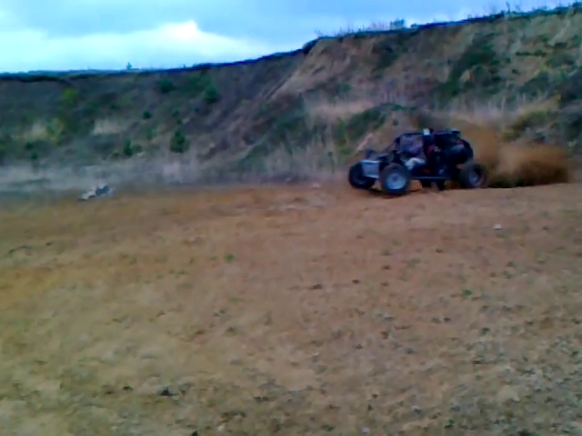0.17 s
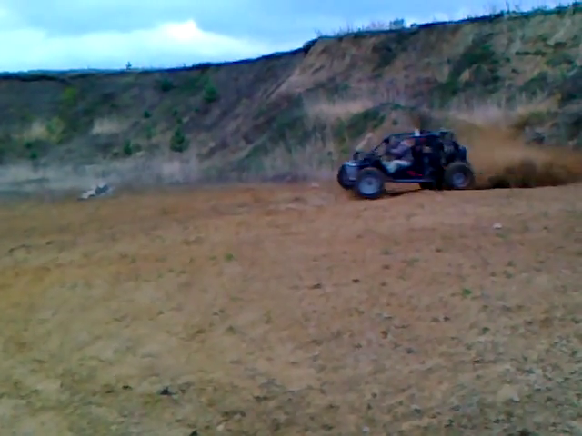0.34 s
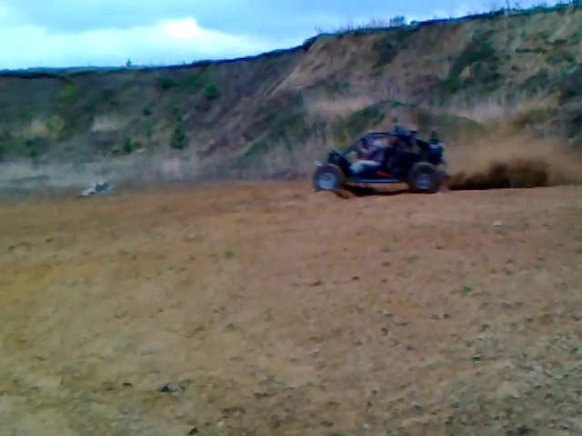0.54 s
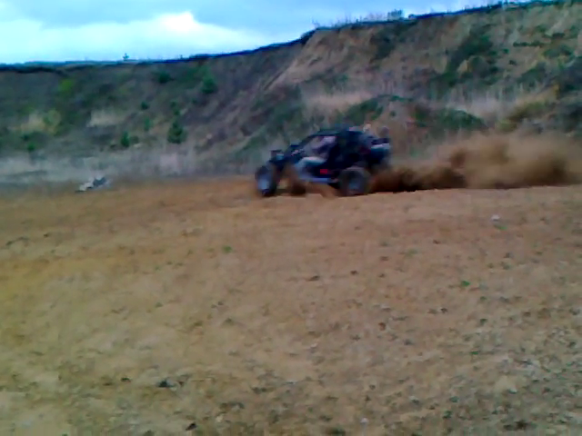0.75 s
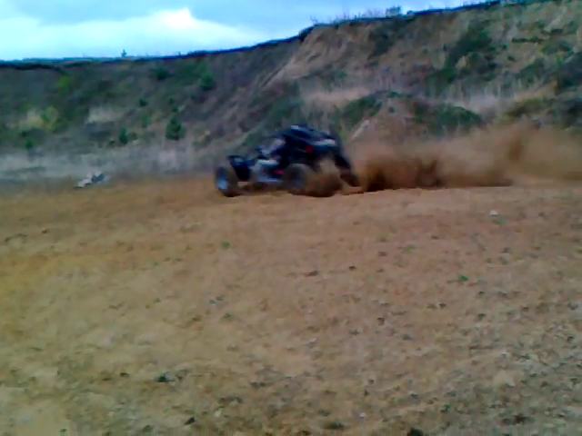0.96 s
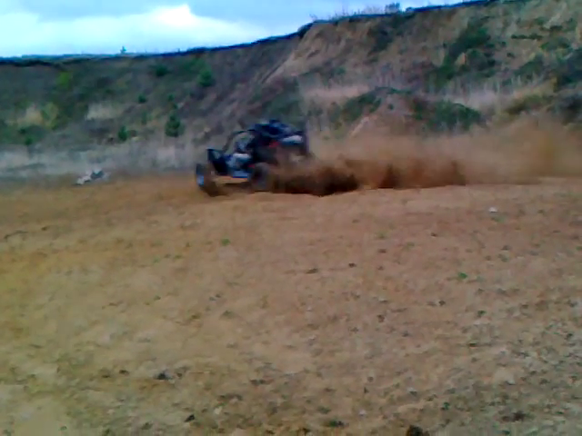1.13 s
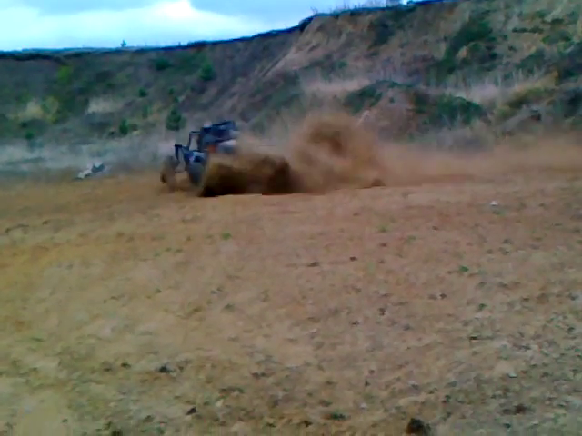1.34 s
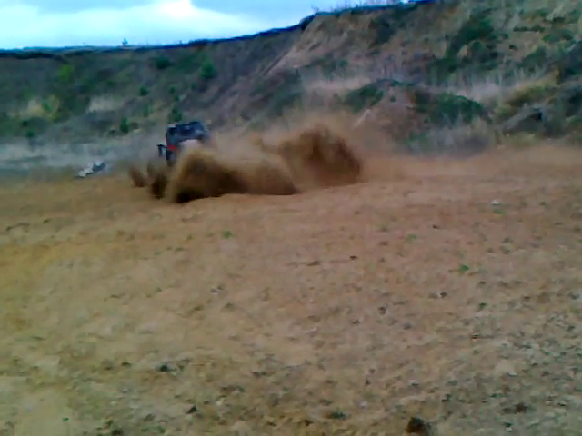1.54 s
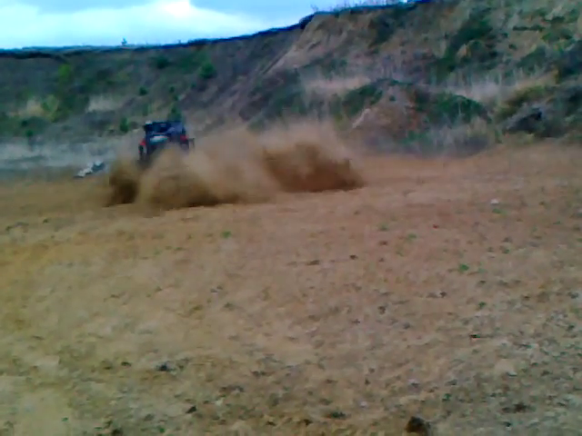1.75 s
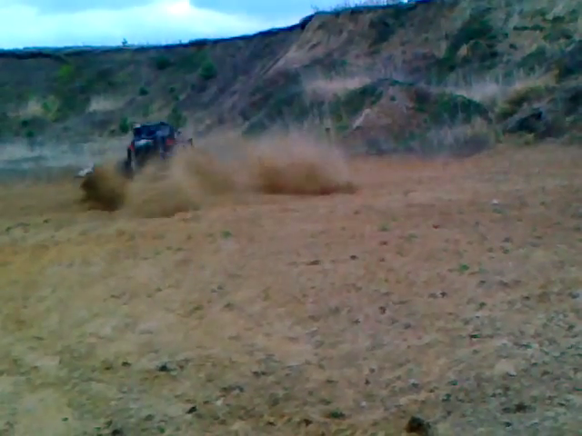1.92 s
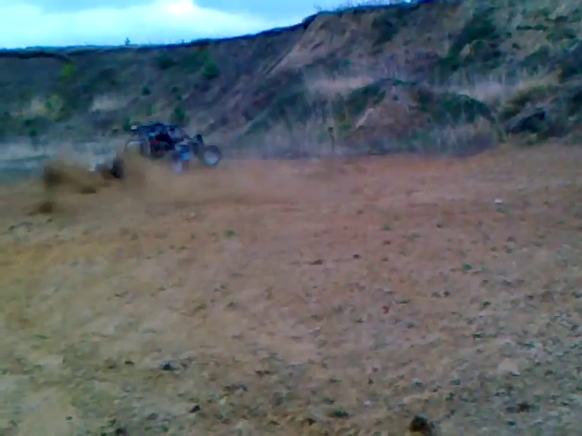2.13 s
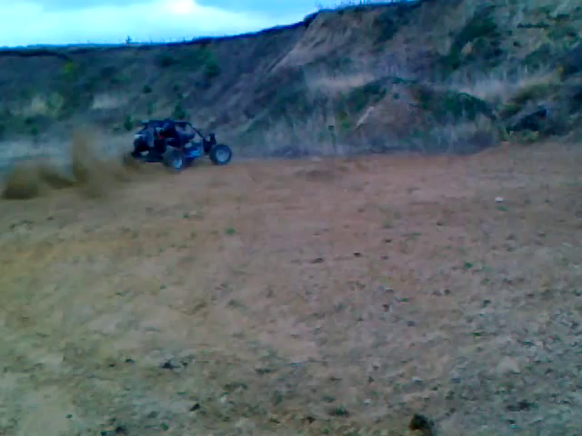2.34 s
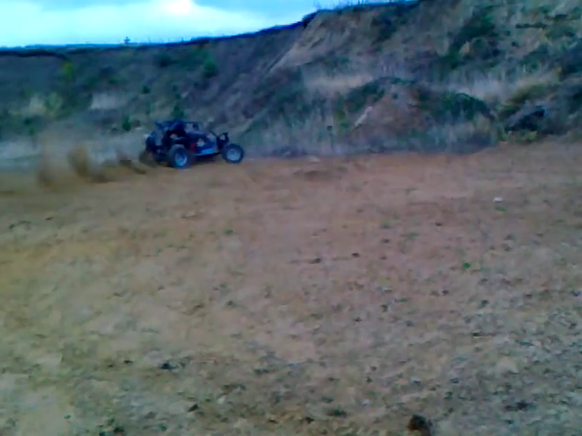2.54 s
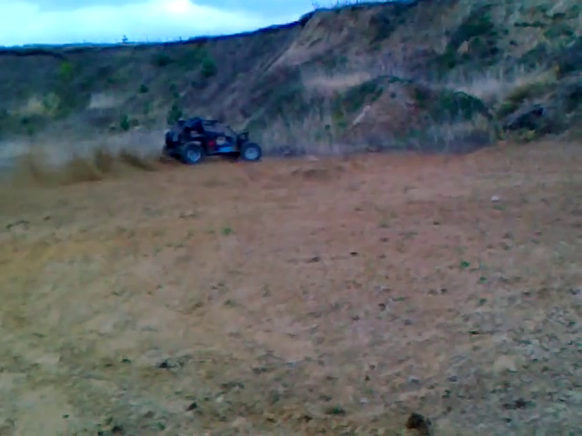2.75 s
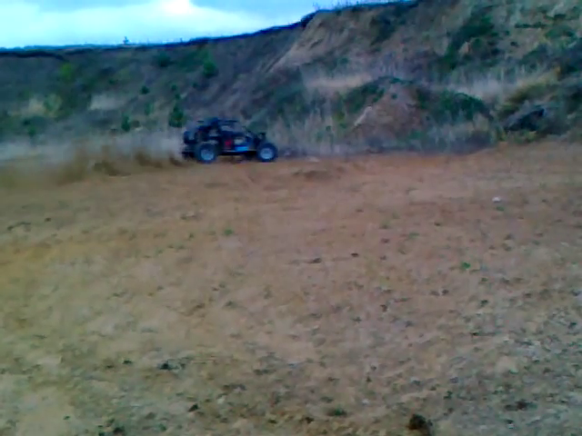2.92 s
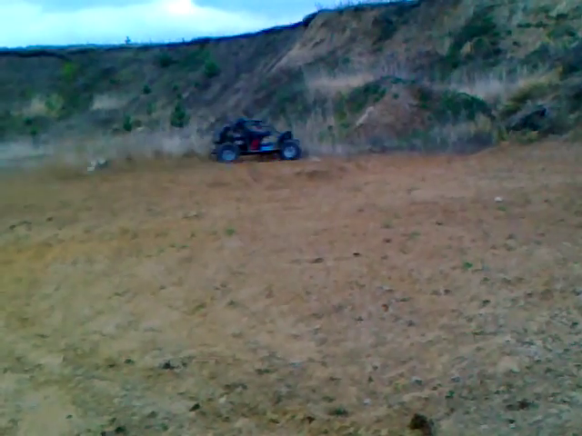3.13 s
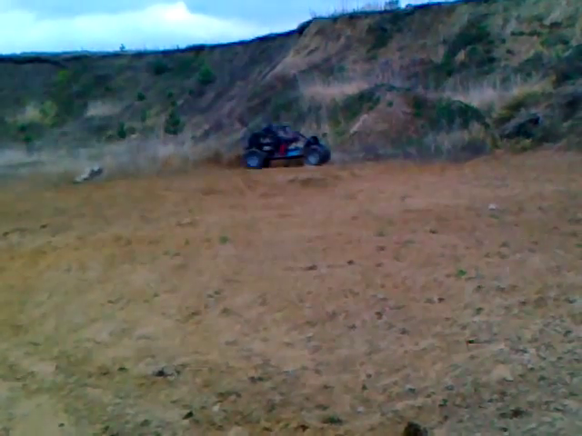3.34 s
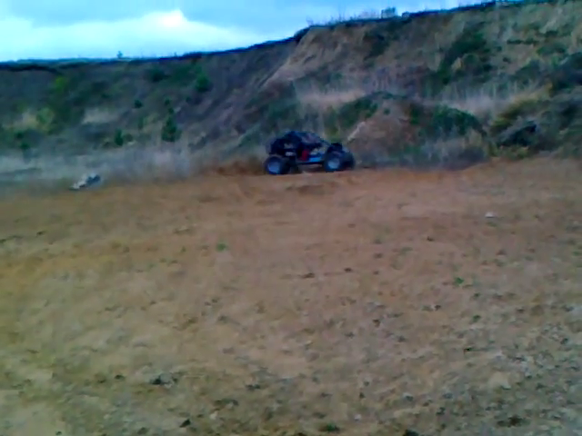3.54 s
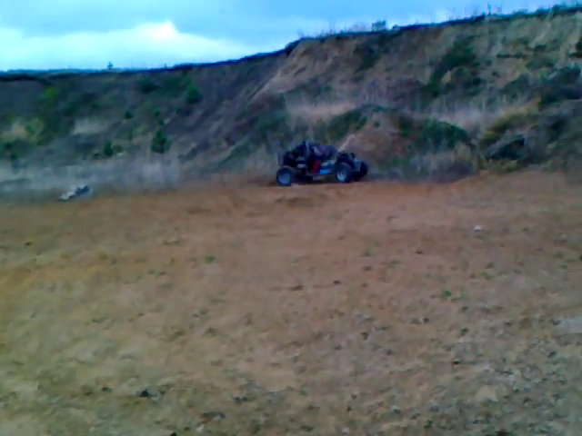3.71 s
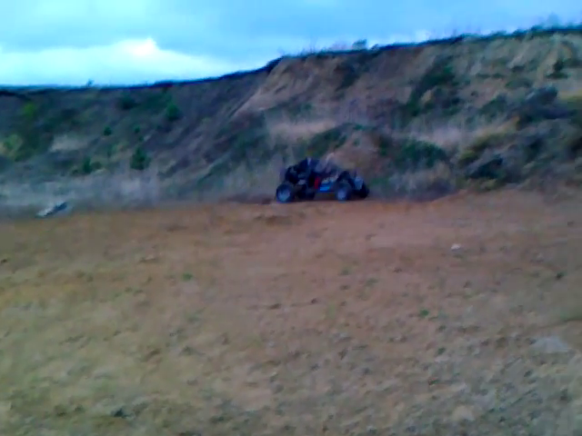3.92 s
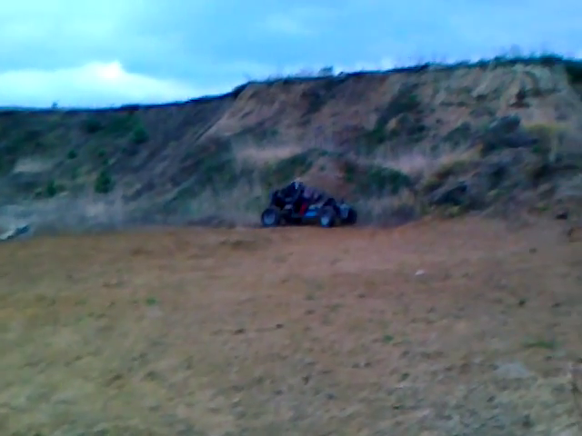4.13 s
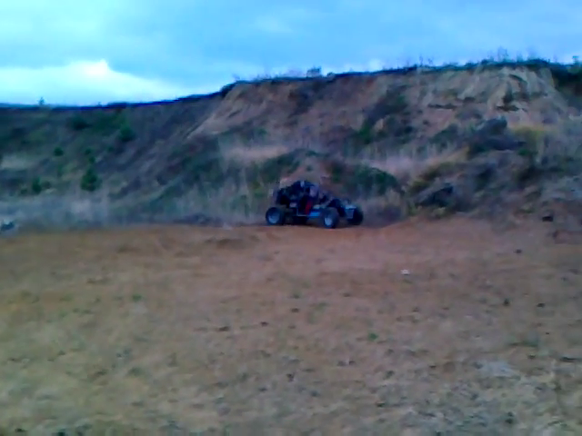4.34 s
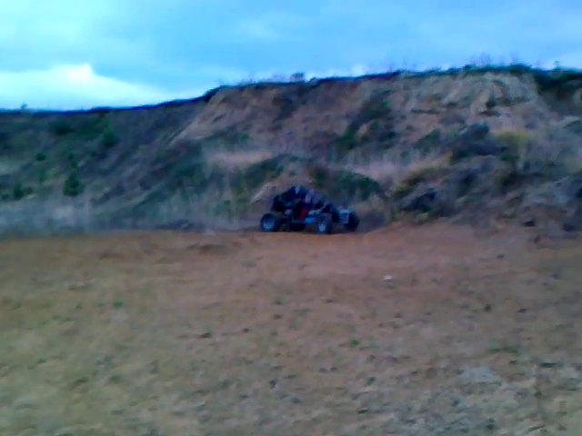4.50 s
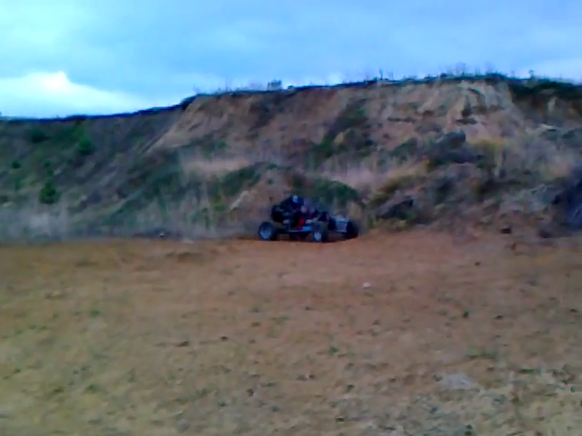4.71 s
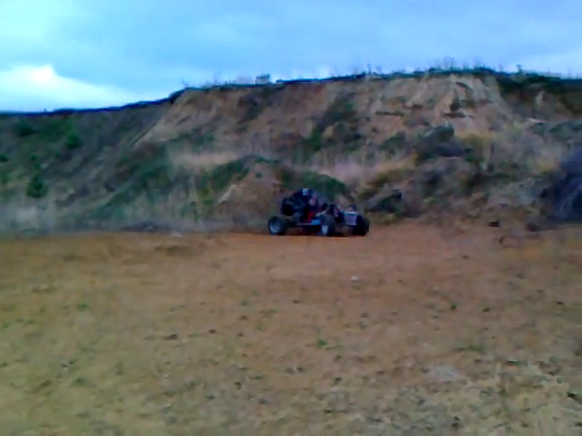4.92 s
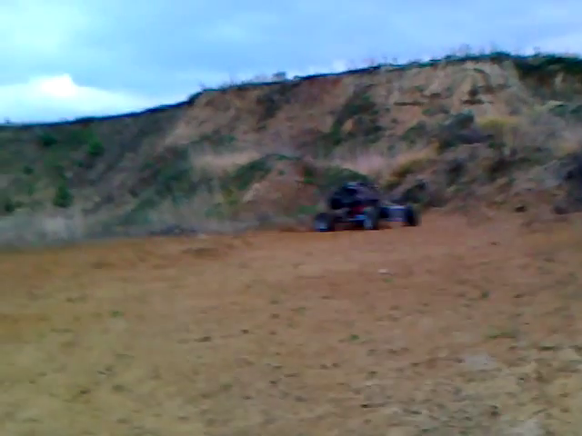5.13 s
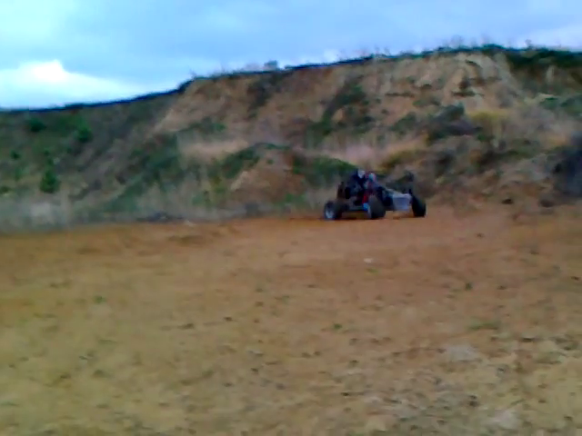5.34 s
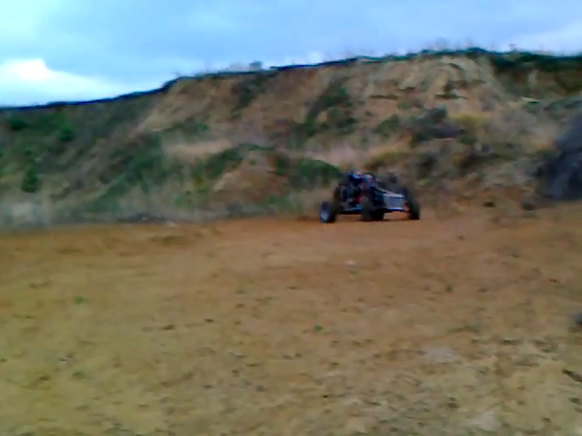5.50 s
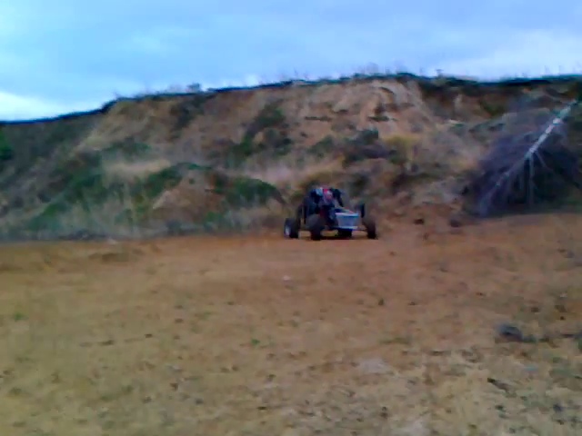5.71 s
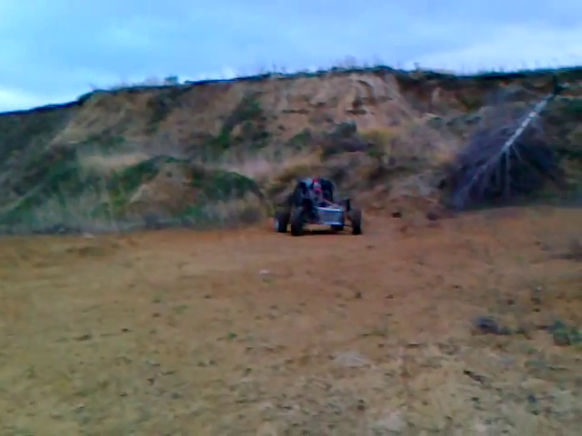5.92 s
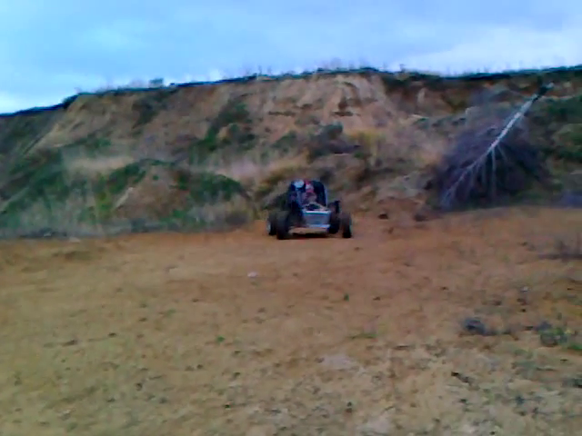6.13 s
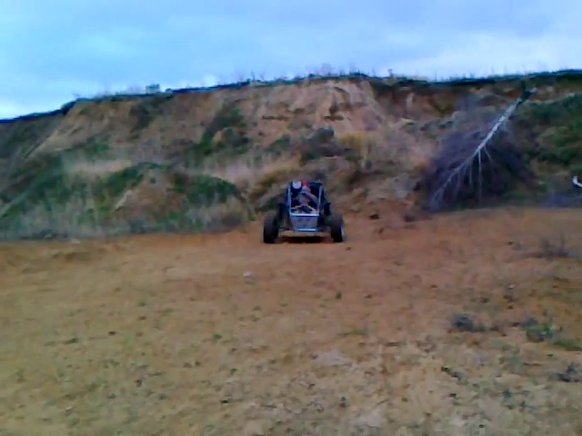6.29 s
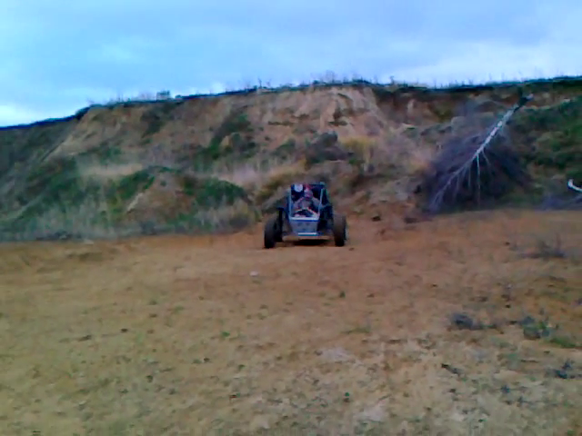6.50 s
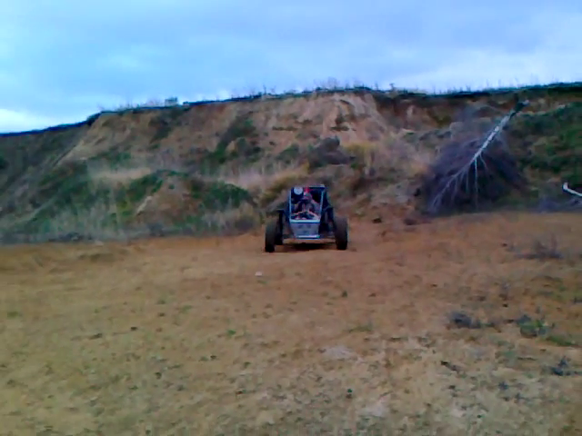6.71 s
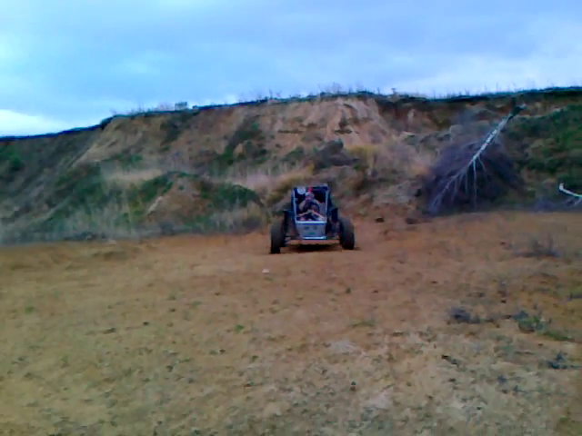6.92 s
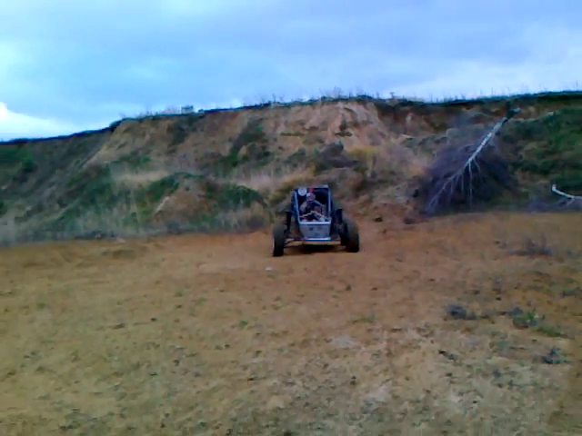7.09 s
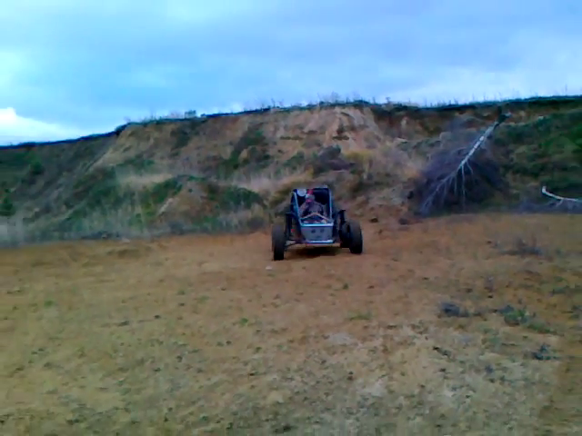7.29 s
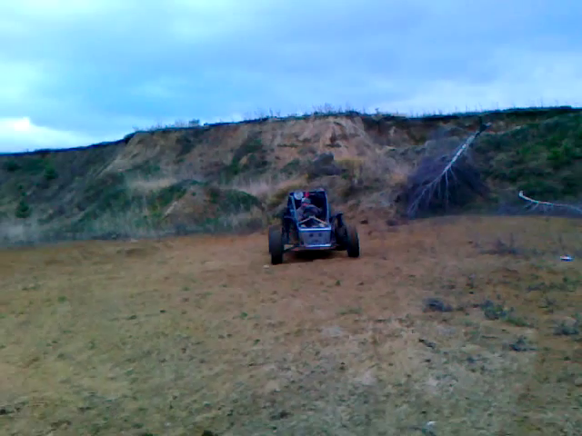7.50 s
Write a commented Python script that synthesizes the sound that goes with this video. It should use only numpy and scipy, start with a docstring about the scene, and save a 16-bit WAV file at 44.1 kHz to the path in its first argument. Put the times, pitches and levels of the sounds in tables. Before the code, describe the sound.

Raspy exhaust of a sliding buggy surges and wavers outdoors, then drops to a low chugging rumble, stones ticking on the chassis, wind thumping the microphone.

```python
"""A high-revving exhaust roar comes first: an off-road buggy slides in circles in a sand pit, throttle blipped.
Then it lugs round and rolls closer. The exhaust booms as sines on the firing orders,
each firing spits a noisy rasp through ringing pipe and frame, and a bright band of noise screeches once.
Stones click on the chassis as short decaying tones, wind is low noise swelling in gusts,
and delayed copies of the bright sounds return from the sand and the pit wall."""
import sys
import numpy as np
from scipy import signal
from scipy.io import wavfile
from scipy.ndimage import uniform_filter1d

SR = 44100
rng = np.random.default_rng(int(sys.argv[2]) if len(sys.argv) > 2 else 0)


def dump_mix(stems):
    """Bounce the given channels to the path in sys.argv[1] as a 16-bit WAV at rate SR."""
    frames = np.atleast_2d(stems).T  # one column per channel
    limited = np.clip(frames, -1, 1)  # hard clip at full scale
    pcm = np.round(limited * 32767).astype(np.int16)
    wavfile.write(sys.argv[1], SR, pcm)


N = 332948  # length in samples


def from_db(db):
    """Gain of a level in dB."""
    return 10 ** (np.asarray(db) / 20)


def rms_one(x):
    """Scale to rms 1."""
    return x / np.sqrt(np.mean(x ** 2) + 1e-20)


def evened(x):
    """Divide out the slow level, leaving the fast shape of each burst."""
    return x / np.sqrt(uniform_filter1d(x ** 2, size=6000))


def in_time(rows):
    """Columns of a time curve, read at every sample."""
    s, *columns = np.transpose(rows)
    return [np.interp(np.arange(N) / SR, s, column) for column in columns]


def at_hz(points, hz):
    """Level in dB of a spectrum curve, read on a log-frequency axis."""
    curve_hz, curve_db = np.array(points).T
    return np.interp(np.log(hz), np.log(curve_hz), curve_db)


def drift(rate_hz):
    """Slow random wander of rms 1: noise through two equal low-pass poles, run at every 40th sample."""
    r = np.exp(-80 * np.pi * rate_hz / SR)
    noise = rng.standard_normal(N // 40 + 2002)
    slow = signal.lfilter([1], [1, -2 * r, r * r], noise)[2000:]  # drop the filter's settling
    return np.interp(np.arange(N) / 40, np.arange(len(slow)), rms_one(slow))


def resonate(x, modes, patchy_db):
    """Parallel resonances, signs alternating; each swells and fades as the buggy turns."""
    out = 0
    for k, (hz, width_hz, level_db) in enumerate(modes):
        r = np.exp(-np.pi * width_hz / SR)
        b = np.array([1, 0, -1]) * (1 - r * r) / 2
        a = [1, -2 * r * np.cos(2 * np.pi * hz / SR), r * r]
        gain = (-1) ** k * from_db(level_db + patchy_db * drift(2.1))
        out = out + gain * signal.lfilter(b, a, x)
    return out


# engine speed before the waver: time_s, firing_rate_hz
SPEED = [(0.0, 156.2), (0.06, 146.2), (0.14, 128.3), (0.17, 127.5), (0.23, 130.8), (0.44, 145.6),
         (0.78, 150.7), (0.9, 150.8), (1.09, 131.1), (1.16, 131.8), (1.26, 139.2), (1.37, 153.7),
         (1.41, 157.0), (1.62, 160.9), (1.74, 150.7), (1.81, 143.7), (1.91, 136.6), (1.93, 136.3),
         (2.08, 146.9), (2.17, 152.5), (2.29, 144.5), (2.39, 131.8), (2.56, 141.0), (2.65, 139.0),
         (2.69, 141.6), (2.8, 143.4), (2.86, 139.9), (3.07, 116.3), (3.22, 111.0), (3.28, 107.2),
         (3.64, 74.1), (3.66, 73.0), (3.95, 65.4), (4.02, 63.5), (4.25, 53.4), (4.27, 53.9), (4.58, 62.2),
         (4.75, 74.5), (5.19, 85.6), (5.32, 86.1), (5.38, 85.1), (5.61, 87.6), (5.76, 83.0), (6.12, 75.5),
         (6.31, 73.9), (6.5, 69.8), (6.71, 68.1), (7.04, 62.0), (7.19, 61.3), (7.55, 61.1)]
# exhaust boom as the buggy turns, before the throb and burble: time_s, level_db (rms)
BOOM = [(0.0, -16.5), (0.12, -21.5), (0.21, -20), (0.5, -13), (0.92, -15.5), (0.99, -22), (1.11, -13),
        (1.17, -12), (1.22, -17.5), (1.3, -13), (1.43, -19), (1.49, -11.5), (1.64, -14.5), (1.83, -21),
        (1.91, -21), (2.0, -12), (2.04, -19.5), (2.1, -12.5), (2.31, -16.5), (2.35, -18.5), (2.42, -17.5),
        (2.63, -17.5), (2.69, -11.5), (3.09, -24.5), (3.13, -19.5), (3.45, -31), (3.55, -19.5),
        (4.08, -16.5), (4.12, -20), (4.75, -15.5), (5.47, -19), (5.84, -16), (6.83, -16.5), (7.55, -14.5)]
# exhaust with no blip, as the pipe swings round and the engine pulls:
# time_s, rasp_db, extra_snap_db, extra_hiss_db, upper_orders_db (reference for lines and burble)
STEADY = [(0, -41, 3, 3, -48.5), (.8, -37.5, -1.5, 0, -42.5), (1.3, -31, 2, 7, -39),
          (1.7, -33.5, -3, -6.5, -41.5), (2.2, -35.5, 0.5, -1, -46), (2.8, -35, 0, -8, -44.5),
          (3.3, -39, 2, 1, -47.5), (3.7, -41, -1, 0, -45), (4.25, -40, 4, 4, -48), (4.45, -36.5, 2, 8, -45),
          (4.7, -32.5, 3, 10, -44.5), (5.02, -29.5, 6, 5, -41.5), (5.2, -32, 6.5, 15, -41.5),
          (5.35, -35.5, 6, 15, -41.5), (5.85, -37, 6.5, 17.5, -43), (6.0, -42, 0, -2, -41.5),
          (6.4, -43.5, -9, 0, -46), (6.7, -47.5, -3, 10, -45.5), (7.15, -45.5, 0, 13.5, -44),
          (7.55, -47.5, -4, 10, -43)]
WAVER, WAVER_HZ = .008, 7  # the wheels grip and slip: spread as a share of the speed, rate
UPPER_SLOPE = 1.076  # dB the upper orders gain per dB of lift
RASP_REF_DB = -37
SNAP_DB, HISS_DB = -54.5, -71  # levels at the reference rasp
SNAP_SLOPE, HISS_SLOPE = 1.265, 1.42  # dB gained per dB of rasp
FLICKER_DB, FLICKER_HZ = 2.0, 10  # snap and hiss flicker together, the snap by half as many dB
# unlike cylinders: level at mean speed and 0 dB boom, growth with speed, share of the boom's dB followed
UNEVEN_DB, UNEVEN_DB_PER_HZ, UNEVEN_FOLLOWS = -23.5, 0.0878, 0.42


def engine():
    """Speed and throttle set every exhaust level; returns the boom and the rasp."""
    rate_hz, = in_time(SPEED)
    boom_db, = in_time(BOOM)
    steady_db, extra_snap_db, extra_hiss_db, upper_db = in_time(STEADY)
    rate_hz = rate_hz * (1 + WAVER * drift(WAVER_HZ))
    turns = np.cumsum(rate_hz) / SR  # one turn per firing

    lift_db = throttle()
    rasp_db = steady_db + lift_db
    upper_db = upper_db + UPPER_SLOPE * lift_db
    flicker_db = FLICKER_DB * drift(FLICKER_HZ)
    above_ref_db = rasp_db - RASP_REF_DB
    snap_db = SNAP_DB + SNAP_SLOPE * above_ref_db + extra_snap_db + .5 * flicker_db
    hiss_db = HISS_DB + HISS_SLOPE * above_ref_db + extra_hiss_db + flicker_db
    uneven_db = UNEVEN_DB + UNEVEN_DB_PER_HZ * (rate_hz - rate_hz.mean()) + UNEVEN_FOLLOWS * boom_db

    orders_db = firing_orders(rate_hz, boom_db, lift_db)
    low = boom(turns, rate_hz, orders_db, upper_db, uneven_db)
    return low, rasp(turns, rate_hz, rasp_db, snap_db, hiss_db, upper_db)


# throttle blips: open_s, held_s (from opening), rise_s (time constant), lift_db (aimed for)
BLIPS = [(-.3, 0.28, .05, 8), (0.132, .71, 0.063, 15.5), (0.998, .72, 0.049, 12), (1.94, 0.26, 0.028, 15),
         (2.359, 0.17, 0.021, 13.5), (2.619, .21, 0.016, 10.5)]
SHUT_S = 0.088  # time constant of the fall when the throttle shuts


def throttle():
    """Lift of the rasp in dB: each blip rises, holds and falls away; the strongest one counts."""
    t, lift_db = np.arange(N) / SR, 0
    for open_s, held_s, rise_s, blip_db in BLIPS:
        since = np.maximum(t - open_s, 0)
        opening = 1 - np.exp(-since / rise_s)
        shutting = np.exp(-np.maximum(since - held_s, 0) / SHUT_S)
        lift_db = np.maximum(lift_db, blip_db * opening * shutting)
    return lift_db


# how the silencer passes the firing orders: frequency_hz, level_db
PASS_BAND = [(55, -16.5), (85, -17.5), (105, 0), (150, -0.5), (230, 0), (295, -1.5), (325, -6.5),
             (400, -12.5), (480, -16.5), (590, -12.5), (650, -18.5)]
# tailpipe swinging towards and away from the microphone, tinting the firing orders:
# time_s, order_1_db, order_2_db, order_3_db, order_4_db
TURNING = [(0, -1, 1.5, -1, 9), (.85, -0.5, 1.5, 0.5, 0), (1.1, 0.5, 1, -0.5, -4), (1.5, -0.5, -5.5, -9, 4),
           (2.0, 2, 7.5, 4, -1), (2.8, -3.5, 4, 1, -12), (3.35, 2.5, -7, -6.5, 0), (3.55, 1.5, 0.5, 0, -3),
           (4.3, 2, -0.5, 1.5, 1), (5.1, 6, 4, 3.5, -0.5), (5.65, 3.5, 2.5, -0.5, 4),
           (6.1, -9, 3.5, 4.5, -6.5), (6.55, -4, 2, -0.5, -1), (7.55, 0, -1, -1, -0.5)]
ORDER_FALL_DB = 2.5  # each firing order is weaker than the one below
FULL_LIFT_DB = 12  # lift counted as wide open
# shut throttle at high revs: fade of the even orders, firings per second over which the overrun sets in
OVERRUN_DB, OVERRUN_RATE_HZ = -14.5, (82, 130)
BURBLE_DB = 4.5  # spread as the boom breaks up on the overrun


def firing_orders(rate_hz, boom_db, lift_db):
    """The first four firing orders share the boom's power as the silencer passes them."""
    order = np.arange(1, 5)[:, None]
    shut = np.clip(1 - lift_db / FULL_LIFT_DB, 0, 1)
    overrun = shut * np.interp(rate_hz, OVERRUN_RATE_HZ, [0, 1])
    share_db = at_hz(PASS_BAND, order * rate_hz) - ORDER_FALL_DB * order + in_time(TURNING)
    share_db = share_db + OVERRUN_DB * overrun * (order % 2 == 0)
    total_db = 10 * np.log10(np.sum(from_db(share_db) ** 2, axis=0))
    burble_db = BURBLE_DB * overrun * [drift(25) for _ in order]
    return boom_db + burble_db + share_db - total_db


# lines between the low firing orders: frequency_hz, relative_level_db
HALF_ORDERS = [(30, -23), (45, -27.5), (75, -14.5), (120, 1), (170, -1.5), (225, -2.5), (330, -6.5),
               (420, -19.5)]
# lines above the fourth firing order: frequency_hz, relative_level_db
UPPER_ORDERS = [(300, 14.5), (380, 5), (480, 3), (600, -1.5), (800, -8), (950, -5), (1200, -9), (1450, -21),
                (1900, -17.5), (2300, -23)]
# burble in the can: frequency_hz, width_hz, relative_level_db
SILENCER = [(225, 168, 5), (484, 170, 1), (570, 43, 1.5), (800, 890, -4)]


def boom(turns, rate_hz, orders_db, upper_db, uneven_db):
    """Sines on the firing orders add up to one pressure pulse a firing; unlike cylinders fill in half orders."""
    out = np.zeros(N)
    lean = 2 * np.pi * .016 * (76 - rate_hz)  # the pipe's return wave tips the pulse with speed
    late = .009 * drift(15)  # in firings: none lands exactly on time
    muffled_db = np.interp(rate_hz, [70, 130], [-10, 0])  # slow, soft pulses carry few overtones
    # the boom throbs unevenly, most at high revs
    throb_db = 1.4 * drift(9) * np.interp(rate_hz, [90, 130], [.5, 1])
    scatter = rng.uniform(0, 2 * np.pi, 33)  # random phases keep the weaker lines from adding up to a buzz
    for k in range(1, 33):  # counted in half orders
        hz, shift = k / 2 * rate_hz, scatter[k]
        if k > 8:  # above the silencer's pass band
            level_db = upper_db - 4.0 + at_hz(UPPER_ORDERS, hz) - 3.8 * (k % 2)
            level_db = level_db + 3.27 * drift(1.66) + muffled_db * (k > 10)
        elif k % 2:
            level_db = uneven_db + at_hz(HALF_ORDERS, hz) + 1.5 * drift(6)
        else:
            level_db = orders_db[k // 2 - 1] + .8 * drift(16) + throb_db
            shift = lean
        out += np.sqrt(2) * from_db(level_db) * np.cos(np.pi * k * (turns + late) + shift)
    burble = rms_one(resonate(rng.standard_normal(N), SILENCER, patchy_db=1.5))
    return out + from_db(upper_db - 7 - .5 * muffled_db) * burble


# steady roar filling the gaps between bursts: time_s, pipe_share, frame_share (both relative)
FILL = [(0, .4, .4), (2.9, .4, .4), (3.3, .8, .7), (4.2, .7, .6), (4.5, .15, .15), (5.2, .18, .25),
        (5.8, .4, .5), (6.4, .9, .5), (6.9, .9, .15), (7.55, .9, .15)]
# ringing of the tailpipe: frequency_hz, width_hz, relative_level_db
PIPE = [(1360, 183, 1), (1673, 230, 3.5), (1998, 340, 3.5), (2264, 399, 3.5), (2810, 387, -2),
        (3080, 200, -4.5), (1428, 63, 1.5), (2226, 98, 1.5)]
# low ringing of the tailpipe: frequency_hz, width_hz, relative_level_db
LOW_PIPE = [(554, 116, -4.5), (790, 93, -0.5), (931, 240, -1), (1160, 92, -2.5)]
# ringing of the frame, heard as the snap: frequency_hz, width_hz, relative_level_db
FRAME = [(3594, 460, 2), (4470, 860, -6.5), (4610, 216, -0.5), (5210, 1230, -5.5), (6700, 1360, -9)]
# bands of the hiss on top: frequency_hz, width_hz, relative_level_db
HISS = [(7330, 340, 1), (9000, 990, -3), (9940, 760, -3.5), (11070, 360, -5), (12500, 2800, -13),
        (14500, 1300, -31)]


def rasp(turns, rate_hz, rasp_db, snap_db, hiss_db, upper_db):
    """Hot gas bursts out just ahead of each pulse and dies away; part of the burst repeats every cycle."""
    count, since = np.divmod(turns + .25, 1)  # a quarter cycle ahead of the pulse
    count = count.astype(int)
    strength = from_db(1.7 * rng.standard_normal((count[-1] + 1, 2)))[count].T  # drawn anew each firing
    noise = rng.standard_normal((2, N))
    pipe_fill, frame_fill = in_time(FILL)
    age = since / rate_hz  # seconds since the valve opened
    repeating = np.interp(age * SR, np.arange(1000), rng.standard_normal(1000))
    shape = (1 - np.exp(-age / 0.0022)) * np.exp(-age / 0.0019)

    burst = pipe_fill * noise[0] + 2.5 * strength[0] * shape * (.7 * noise[0] + .9 * repeating)
    strong = from_db(-7.0 * (count % 2))  # one cylinder snaps harder than the other
    snap_shape = 0.64 * frame_fill + 1.54 * strong * strength[0] * strength[1] * shape
    snap = evened(noise[1] * snap_shape)

    pipe = from_db(rasp_db) * rms_one(resonate(evened(burst), PIPE, patchy_db=1.5))
    low_pipe = rms_one(resonate(evened(burst + noise[0]), LOW_PIPE, patchy_db=3.0))
    low_pipe = from_db(.5 * (rasp_db + upper_db) - 7.5) * low_pipe
    frame = from_db(snap_db) * rms_one(resonate(snap, FRAME, patchy_db=1.8))
    hiss = from_db(hiss_db) * rms_one(resonate(snap, HISS, patchy_db=1.8))
    return pipe + low_pipe + frame + hiss


# bright screech as the throttle reopens, before its flutter: time_s, level_db
SCREECH = [(1.02, -66), (1.07, -33.5), (1.18, -35), (1.28, -69)]


def screech():
    """Noise in one narrow bright band, its level fluttering fast."""
    s, level_db = np.transpose(SCREECH)
    curve_db = np.interp(np.arange(N) / SR, s, level_db, left=-99, right=-99)
    band = resonate(rng.standard_normal(N), [(4000, 400, 0), (4600, 500, 0)], patchy_db=0)
    return from_db(curve_db + 3.8 * drift(40)) * rms_one(band)


# stones on the chassis: start_s, relative_knock_db, ring_hz (once settled), relative_crack_db, crack_hz
STONES = [(2.89, -30, 1900, -39, 3400), (6.156, -46, 1900, -56, 4300), (4.227, -24, 1160, -30.5, 3500),
          (4.231, -20, 1630, -31, 4130), (4.293, -42, 931, -53, 3050), (4.329, -46, 1610, -50, 3170),
          (4.371, -38, 1800, -36.5, 3750), (5.347, -19, 2050, -25, 4460), (5.474, -21, 1060, -48, 3040),
          (5.716, -18, 1660, -42, 3720), (5.769, -24, 1860, -49, 4570), (5.866, -29, 1380, -45, 3880),
          (5.948, -18, 1420, -49, 4250), (6.053, -15.5, 1800, -36.5, 3220)]


def stones():
    """Each stone is a sharp crack with a short dull ring of the tube it hits, sagging in pitch."""
    out, t = np.zeros(N), np.arange(600) / SR
    sag = t + .0003 * (1 - np.exp(-t / .0005))  # phase runs fast at first
    knock_shape = (1 - np.exp(-t / 0.00055)) * np.exp(-t / .0013)
    crack_shape = (1 - np.exp(-t / 0.00018)) * np.exp(-t / 0.00028)
    for start_s, knock_db, ring_hz, crack_db, crack_hz in STONES:
        tube, plate = np.zeros(600), np.zeros(600)
        for ratio, level in [(1, 1), (.62, .9), (.37, .5)]:
            tube += level * np.sin(2 * np.pi * ratio * ring_hz * sag)
        for ratio, level in [(1, 1), (1.5, 0.5), (2.0, 0.1)]:
            plate += level * np.sin(2 * np.pi * ratio * crack_hz * t)
        knock = from_db(knock_db + 7.5) * tube * knock_shape
        crack = from_db(crack_db + 28.0) * plate * crack_shape
        i = round((start_s + .0006) * SR)
        out[i:i + 600] += knock + crack
    return out


# gusts on the microphone, added to the calm air: peak_s, level_db
GUSTS = [(.0, -36), (.24, -31), (.48, -33), (0.762, -30), (1.791, -33), (2.018, -38.5), (2.2, -31),
         (2.43, -31), (2.65, -35), (2.86, -34), (3.12, -37), (3.33, -33), (3.86, -32), (5.0, -48),
         (7.45, -47)]
GUST_S, CALM_DB = 0.067, -49.5  # spread of a bell-shaped gust; mean level of the air between gusts


def wind():
    """Lumpy low noise on the microphone port, swelling in gusts."""
    t = np.arange(N) / SR
    gain = from_db(CALM_DB + 3.0 * drift(2.5))
    for peak_s, level_db in GUSTS:
        gain = gain + from_db(level_db) * np.exp(-.5 * ((t - peak_s) / GUST_S) ** 2)
    band = signal.butter(2, [32, 80], "band", fs=SR, output="sos")
    low = signal.sosfilt(band, rng.standard_normal(N + SR))[SR:]  # drop the filter's settling
    return gain * rms_one(low * from_db(0.47 * drift(8)))


# dull echoes of the pit wall: delay_s, level_db
WALL = [(.021, -20), (.083, -19), (.137, -21), (.21, -24)]
GROUND_S, GROUND_DB = 0.001298, -16.5  # bounce off the sand: mean delay, level


def pit_wall(x):
    """A quick bounce off the sand and a few low-passed echoes from the wall."""
    dull, echoes = signal.sosfilt(signal.butter(2, 2500, fs=SR, output="sos"), x), np.zeros(N)
    for delay_s, level_db in WALL:
        lag = round(delay_s * SR)
        echoes[lag:] += from_db(level_db) * dull[:N - lag]
    ground_lag = SR * GROUND_S * (1 + 0.092 * drift(0.19))  # the path changes as the buggy circles
    bounce = np.interp(np.arange(N) - ground_lag, np.arange(N), x)
    return echoes + from_db(GROUND_DB) * bounce


def scene():
    """Engine and stones in the pit, wind on the microphone; only the bright sounds echo."""
    exhaust_boom, exhaust_rasp = engine()
    bright = exhaust_rasp + screech() + stones()
    low = exhaust_boom + wind()
    return (low + bright + pit_wall(bright))[None]


CUTOFF_HZ = 17140  # nothing but traces 70 dB down above this


def record(dry):
    """Peaks are rounded, the microphone fades towards the top, the top is cut."""
    rounded = 1.197 * np.tanh(dry / 1.194)
    soft = signal.sosfilt(signal.butter(3, 13500, fs=SR, output="sos"), rounded)
    return signal.sosfilt(signal.cheby2(12, 70, CUTOFF_HZ, fs=SR, output="sos"), soft)


dry = scene()
out = record(dry)
dump_mix(out)
```